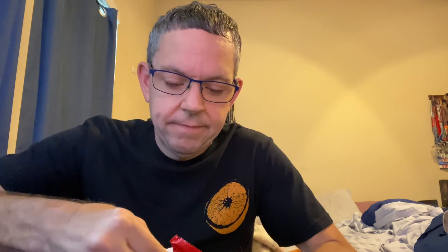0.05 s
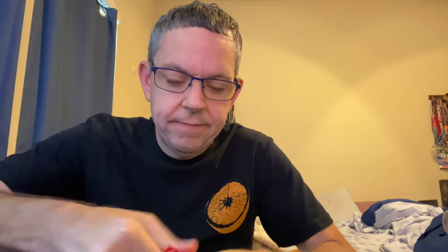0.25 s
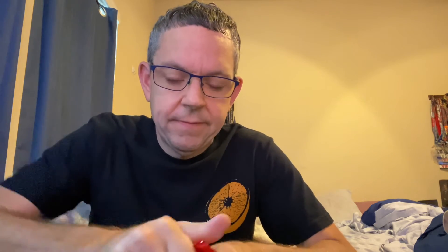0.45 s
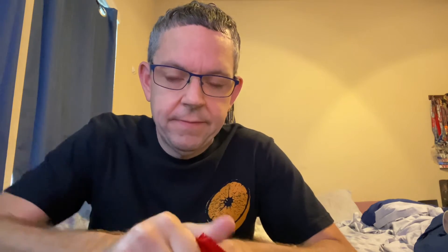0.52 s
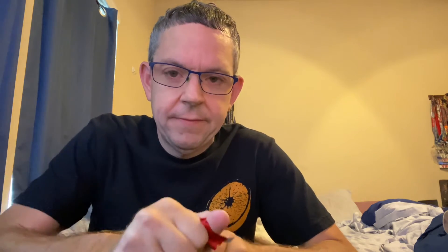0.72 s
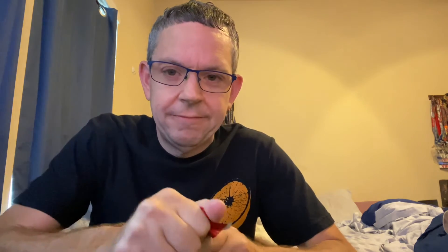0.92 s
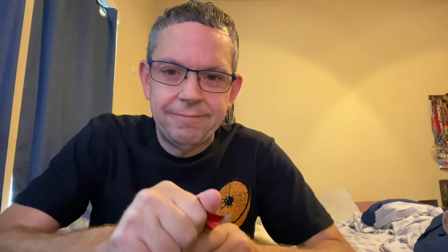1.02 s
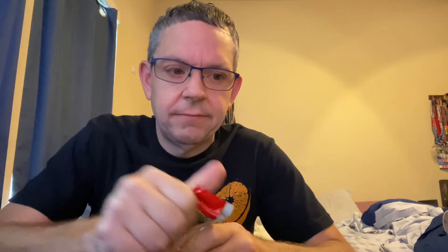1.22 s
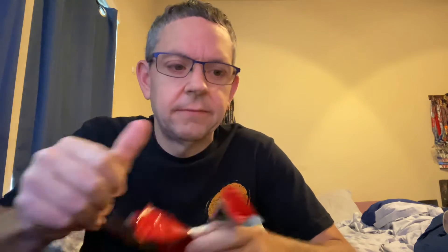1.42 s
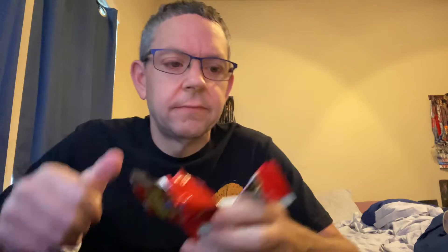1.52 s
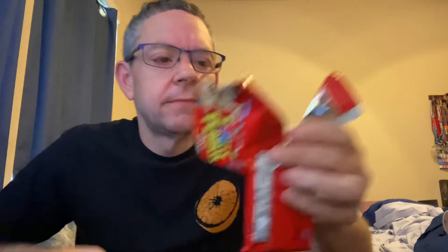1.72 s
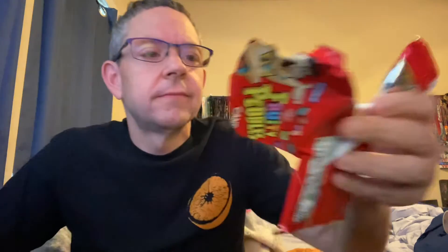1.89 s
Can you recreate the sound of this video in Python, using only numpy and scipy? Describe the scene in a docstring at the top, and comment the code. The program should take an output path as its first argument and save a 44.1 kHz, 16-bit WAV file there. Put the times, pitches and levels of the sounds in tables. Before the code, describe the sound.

Plastic candy wrapper tearing open, with sharp crackles and light rustling between the fingers.

```python
"""A plastic candy wrapper is gripped, ripped open and peeled back near a stereo microphone in a small room.
The seam tears in fast runs of ticks, creases buckle in single snaps and whole panels pop through.
The film rustles and squeaks between the fingers. The room adds a short tail, and a brief reflection
after one loud snap; room air, a low rumble and a faint hum lie underneath."""
import sys
import numpy as np
from scipy import signal
from scipy.fft import rfft, irfft, next_fast_len
from scipy.io import wavfile

SR = 44100
rng = np.random.default_rng(int(sys.argv[2]) if len(sys.argv) > 2 else 0)


def master(y):
    """Save y as 16-bit WAV."""
    cut = np.clip(np.atleast_2d(y).T, -1, 1)
    pcm = np.round(cut * 32767)  # scale
    wavfile.write(sys.argv[1], SR, pcm.astype(np.int16))


N = 85995

# film bands (low, mid, high, top): lower_hz, upper_hz
BANDS_HZ = [(350, 1200), (1200, 3500), (3500, 9000), (9000, 16000)]
TICK_DECAY_S = 0.00056
SLIDE_TICKS_PER_S, SLIDE_SCATTER_DB = 1500, 2.5
BURST_SPAN_S = 0.004  # snap and pop levels: energy spread over this span


def amp(db):
    """Decibels to gain."""
    return 10 ** (np.asarray(db) / 20)


def unit(x):
    """Scale to rms 1."""
    return x / np.sqrt(np.mean(x ** 2) + 1e-20)


def add(out, x, start_s):
    """Mix x into out at start_s."""
    i = max(int(start_s * SR), 0)
    out[:, i:i + x.shape[1]] += x[:, :N - i]


def colour(x, points):
    """Minimum-phase filter through points: freq_hz, gain_db."""
    hz, db = np.array(points).T
    size = 2 * next_fast_len(x.shape[-1])
    bins_hz = np.maximum(np.fft.rfftfreq(size, 1 / SR), 1)
    gain = amp(np.interp(np.log(bins_hz), np.log(hz), db))
    cepstrum = irfft(np.log(gain))
    cepstrum[1:size // 2] *= 2
    cepstrum[size // 2 + 1:] = 0
    return irfft(rfft(x, size) * np.exp(rfft(cepstrum)))[..., :x.shape[-1]]


def noise_pair(apart, size):
    """Stereo white noise; apart is the share of power not common to both channels."""
    common = np.sqrt(1 - apart) * rng.standard_normal(size)
    return common + np.sqrt(apart) * rng.standard_normal((2, size))


def wide_noise(points, side_db):
    """Coloured mid/side noise."""
    mid, side = (unit(colour(rng.standard_normal(N), points)) for _ in range(2))
    return mid + amp(side_db) * side * np.array([[1], [-1]])


def background():
    """Swelling low rumble, faint steady hum and room air."""
    # rumble envelope: time_s, level_db
    rumble_levels = [(0, -51), (.85, -48), (1.13, -48), (1.4, -46), (1.56, -53)]
    # rumble spectrum: freq_hz, gain_db
    rumble_spectrum = [(20, -41), (42, 10.5), (52, 14), (78, 5.5), (160, -57.5)]
    # hum tones: pitch_hz, level_db
    hum_tones = [(119.7, -60), (277, -60.5)]
    # air spectrum: freq_hz, gain_db
    air_spectrum = [(40, -33.5), (90, 5), (230, -1.5), (330, -7.5), (500, -15.5), (1200, -27.5),
                    (5000, -31), (15000, -66)]
    t = np.arange(N) / SR
    swell = amp(np.interp(t, *np.array(rumble_levels).T) + 2)
    pan = amp([[1], [-1]])
    rumble = wide_noise(rumble_spectrum, side_db=-54) * swell * pan
    hum = sum(amp(db) * np.sqrt(2) * np.sin(2 * np.pi * (hz * t + rng.random())) for hz, db in hum_tones)
    air = wide_noise(air_spectrum, side_db=-3.5) * amp(-53)
    return rumble + hum + air


def room(x, delay_s=0.003, build_s=0.0044):
    """Diffuse wall echo; the lows last longest."""
    # tail bands: centre_hz, t60_s, gain_db
    bands = [(400, 0.4, -10.5), (2130, 0.21, -5.5), (6200, 0.25, -10), (11700, 0.21, -14.5)]
    centres_hz, t60s_s, gains_db = np.array(bands).T
    t = np.arange(SR // 2) / SR
    bins_hz = np.maximum(np.fft.rfftfreq(len(t), 1 / SR), 1)
    spectrum = rfft(noise_pair(apart=0.55, size=len(t)))
    onset = np.clip((t - delay_s) / build_s, 0, 1)
    tail = 0
    for selector, t60_s, db in zip(np.eye(len(bands)), t60s_s, gains_db):
        weight = np.interp(np.log(bins_hz), np.log(centres_hz), selector)
        envelope = onset * np.exp(-np.log(1000) * t / t60_s)
        tail += irfft(spectrum * weight, len(t)) * envelope / np.linalg.norm(envelope) * amp(db)
    return signal.fftconvolve(x, tail, axes=1)[:, :N]


def microphone_pair(x):
    """The microphone pair shifts the channels' phase against each other."""
    # left channel's lead: freq_hz, phase_rad
    lead = [(0, 0), (2500, -2), (5000, -3), (6200, -5), (7500, -4), (9200, -4.5), (12100, 2), (14500, 1)]
    phase_rad = np.interp(np.fft.rfftfreq(N, 1 / SR), *np.array(lead).T)
    return irfft(rfft(x) * np.exp(0.5j * phase_rad * np.array([[1], [-1]])), N)


def ticks(rate_per_s, scatter_db, decay_s, size):
    """Envelope of tiny random ticks, each dying away fast."""
    fires = rng.random(size) < rate_per_s / SR
    hits = fires * amp(scatter_db * np.clip(rng.standard_normal(size), -2, 2))
    power = signal.lfilter([1], [1, -np.exp(-2 / (decay_s * SR))], hits ** 2)
    return np.sqrt(power + 1e-6)


def film(drive, band_hz, narrowing_hz=3080):
    """Pressure from a patch of film in one band, rms 1; higher bands are narrower in stereo."""
    # film response: freq_hz, gain_db
    response = [(950, -2.5), (1500, 1.5), (4300, 4), (7400, 5.5), (9100, -0.5), (13000, 1), (15500, -16.5)]
    apart = 0.64 / (1 + (band_hz[0] / narrowing_hz) ** 2)
    crackle = drive * noise_pair(apart, len(drive))
    bandpass = signal.butter(3, band_hz, "bandpass", fs=SR, output="sos")
    return unit(colour(signal.sosfilt(bandpass, crackle), response))


def around(centre_hz, width_oct):
    """Band edges in Hz about a centre."""
    return centre_hz * 2 ** (np.array([-0.5, 0.5]) * width_oct)


def rustle():
    """Film sliding in the fingers crackles finely; the top band has its own envelope."""
    # finger motion: time_s, level_db, top_offset_db
    motion = [(0, -47.5, -17), (0.13, -106, -25), (.228, -49, -9.5), (.44, -58, -13), (.66, -52.5, -6),
              (0.831, -68, -20), (0.921, -71, 9.5), (1.04, -70, -3), (1.3, -53.5, -10), (1.37, -66.5, -0.5),
              (1.48, -53.5, -2), (1.56, -68.5, -4), (1.61, -57, 2.5), (1.71, -51, -7), (1.76, -69, 3),
              (1.831, -66.5, 5.5), (1.912, -50.5, -2.5)]
    # balance of the film bands: gain_db
    balance = [-11, -7.5, -1.5, 0]
    times_s, level_db, top_offset_db = np.array(motion).T
    t = np.arange(N) / SR
    drive = ticks(SLIDE_TICKS_PER_S, SLIDE_SCATTER_DB, TICK_DECAY_S, N)
    low, mid, high, top = (film(drive, band_hz) * amp(db) for band_hz, db in zip(BANDS_HZ, balance))
    top *= amp(np.interp(t, times_s, top_offset_db))
    return (low + mid + high + top) * amp(np.interp(t, times_s, level_db))


def rubs():
    """Skin sticks and slips on the film and stirs one narrow resonance."""
    # fingertip squeaks: peak_s, width_s, pitch_hz, level_db
    squeaks = [(0.8, 0.21, 1430, -62.5), (1.333, 0.01, 1900, -48)]
    out, t = np.zeros((2, N)), np.arange(N) / SR
    for peak_s, width_s, pitch_hz, level_db in squeaks:
        slips = ticks(SLIDE_TICKS_PER_S, SLIDE_SCATTER_DB, TICK_DECAY_S, N)
        swell = np.exp(-2 * ((t - peak_s) / width_s) ** 2)
        out += film(slips, around(pitch_hz, width_oct=0.42)) * amp(level_db) * swell
    return out


def pops(decay_s=0.003):
    """A panel flips with a hollow knock; larger panels ring lower, slack ones more broadly."""
    # panel flips: start_s, pitch_hz, width_oct, level_db
    panels = [(.259, 504, 0.76, -34.5), (.459, 3510, 0.42, -34.5), (.461, 1980, 0.21, -41.5),
              (0.8618, 976, 0.3, -42.5), (0.862, 1710, 0.33, -36.5), (1.193, 1740, 0.59, -36),
              (1.2256, 940, 0.76, -35.5), (1.227, 404, 1, -34.5), (1.706, 3580, 0.43, -40.5)]
    out, t = np.zeros((2, N)), np.arange(2048) / SR
    span_gain = np.sqrt(BURST_SPAN_S * SR / len(t))
    for start_s, pitch_hz, width_oct, level_db in panels:
        knock = film(np.exp(-t / decay_s), around(pitch_hz, width_oct))
        add(out, knock * amp(level_db) * span_gain, start_s)
    return out


def snaps(trim_db=-2, low_re_mid_db=-7.5):
    """A crease buckles: a sharp crack of a few ticks; the low band lasts longest."""
    # buckling creases: start_s, mid_db, high_db, top_db
    creases = [(0.2308, -58, -30, -50), (0.235, -37, -28, -48), (0.238, -38, -32, -33),
               (0.351, -60, -40, -39.5), (0.4293, -51.5, -42, -45.5), (0.4578, -39, -28.5, -40.5),
               (0.521, -49.5, -41.5, -66), (0.5625, -44, -40.5, -47), (0.5874, -48, -43, -50),
               (0.638, -58, -40.5, -44.5), (0.6678, -53.5, -41, -47), (0.861, -35, -28.5, -42.5),
               (0.8644, -37, -28.5, -48), (0.869, -46, -45, -45), (0.8842, -38.5, -39, -39.5),
               (0.9482, -43, -33, -38), (1.056, -52.5, -41.5, -41), (1.133, -58, -46.5, -54),
               (1.1548, -43.5, -33, -52), (1.1917, -44.5, -35, -44), (1.2259, -38, -24.5, -32),
               (1.387, -51.5, -50, -65), (1.4029, -50.5, -48, -53), (1.4386, -45, -36.5, -52),
               (1.4628, -70, -39.5, -46.0), (1.6123, -54, -59, -44.5), (1.7063, -46.5, -40.5, -53),
               (1.7803, -54, -45, -52)]
    out, t = np.zeros((2, N)), np.arange(2048) / SR
    span_gain = np.sqrt(BURST_SPAN_S * SR / len(t))
    decays_s = np.geomspace(0.0048, 0.0021, len(BANDS_HZ))
    for start_s, mid_db, high_db, top_db in creases:
        grain = 0.18 + ticks(rate_per_s=3300, scatter_db=1.5, decay_s=0.00014, size=len(t))
        levels_db = [mid_db + low_re_mid_db, mid_db, high_db, top_db]
        for band_hz, db, decay_s in zip(BANDS_HZ, levels_db, decays_s):
            crack = film(grain * np.exp(-t / decay_s), band_hz)
            add(out, crack * amp(db + trim_db) * span_gain, start_s)
    return out


def film_ring(x, t60_s=0.088, gain_db=-21.5):
    """Faint ring of the taut film."""
    # film modes: pitch_hz, relative_db
    modes = [(5184, -15), (5859, 3), (7036, 4), (7520, 7.5)]
    t = np.arange(SR // 2) / SR
    ring = sum(amp(db) * np.sin(2 * np.pi * hz * t) for hz, db in modes)
    ring *= np.exp(-np.log(1000) * t / t60_s)
    return amp(gain_db) * signal.fftconvolve(x, [ring / np.linalg.norm(ring)], axes=1)[:, :N]


def tick_runs():
    """Short runs of fast ticks: film tearing, and a brief room reflection after the snap near 1.23 s."""
    # tears and the reflection (1.241 s): start_s, length_s, swell_db, low_db, mid_db, high_db, top_db
    runs = [(.239, .0135, 1, -50, -36, -24.5, -28), (.2524, .0046, 2, -46, -31, -16.5, -20),
            (.258, 0.0088, -20, -42, -47, -39, -39), (0.871, 0.013, -3, -49, -42, -52, -58),
            (1.162, 0.057, 3, -59, -70, -53, -59), (1.241, 0.0192, 1, -49, -47, -42.5, -53),
            (1.588, 0.019, 1, -67, -56, -50, -57), (1.674, 0.0135, 12, -55, -53, -42, -34),
            (1.688, 0.008, -4, -51, -49, -42, -42)]
    out, t = np.zeros((2, N)), np.arange(4096) / SR
    for start_s, length_s, swell_db, *levels_db in runs:
        swell = amp(swell_db * np.minimum(t / length_s, 1))
        release = np.exp(-np.maximum(t - length_s, 0) / TICK_DECAY_S)
        grain = 0.35 + ticks(rate_per_s=830, scatter_db=5.5, decay_s=TICK_DECAY_S, size=len(t))
        span_gain = np.sqrt(length_s * SR / len(t))
        for band_hz, db in zip(BANDS_HZ, levels_db):
            add(out, film(swell * release * grain, band_hz) * amp(db) * span_gain, start_s)
    return out + film_ring(out)


def scene():
    """The wrapper in its room."""
    wrapper = snaps() + pops() + tick_runs() + rubs() + rustle()
    return microphone_pair(wrapper + room(wrapper)) + background()


def record(dry):
    """Steep low-pass at 16.3 kHz."""
    return signal.sosfilt(signal.ellip(8, 0.2, 80, 16300, fs=SR, output="sos"), dry)


dry = scene()
out = record(dry)
master(out)
```